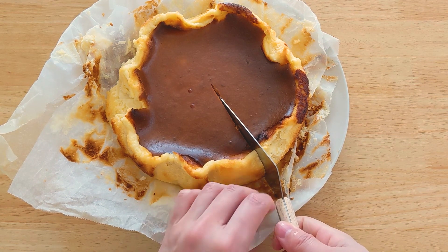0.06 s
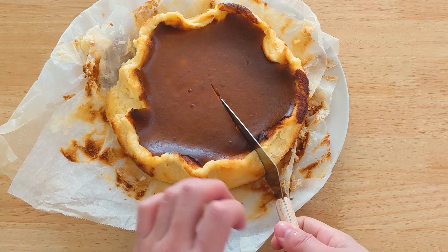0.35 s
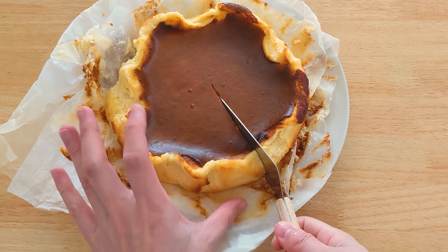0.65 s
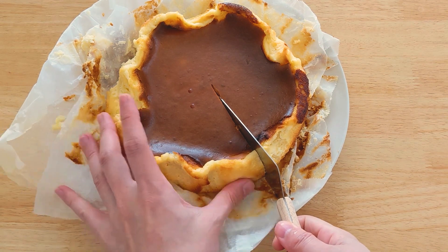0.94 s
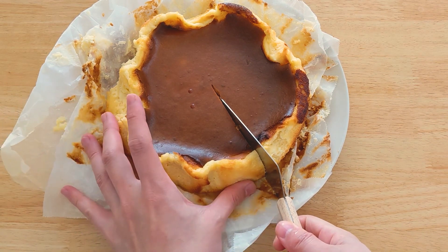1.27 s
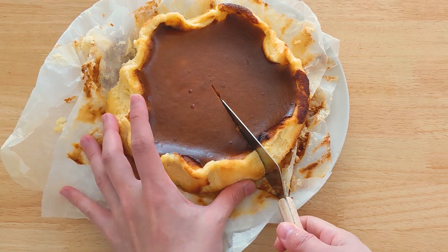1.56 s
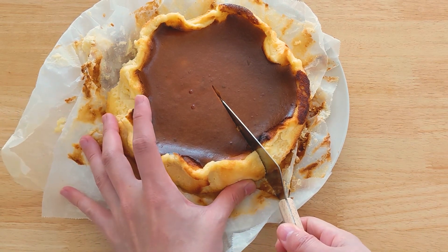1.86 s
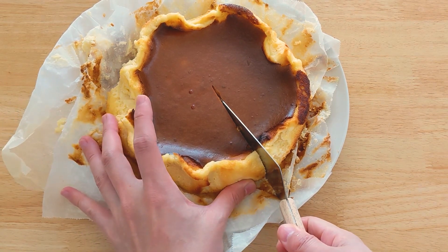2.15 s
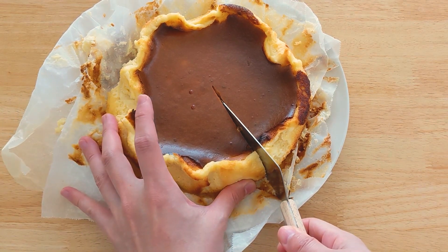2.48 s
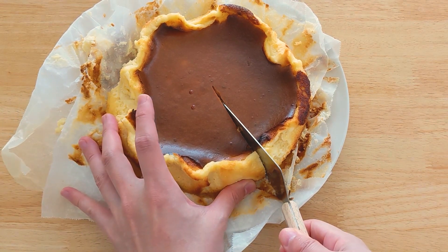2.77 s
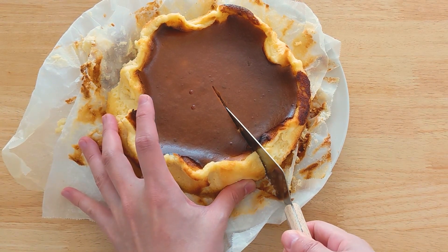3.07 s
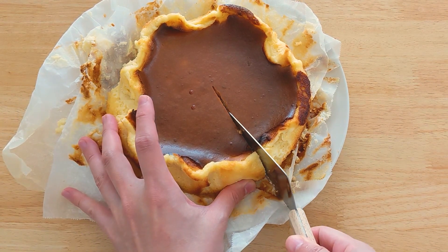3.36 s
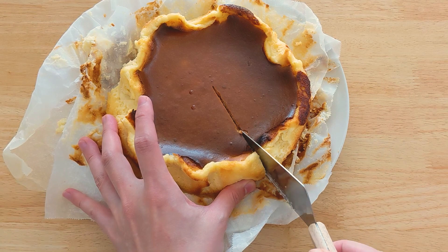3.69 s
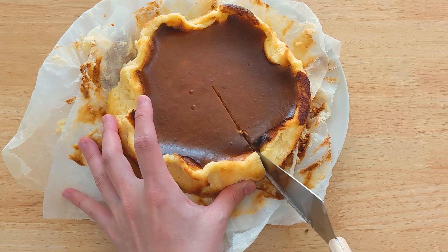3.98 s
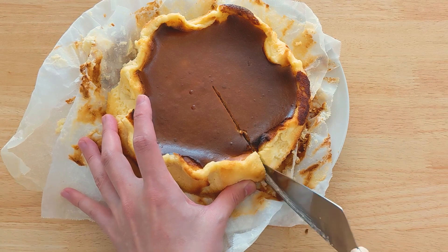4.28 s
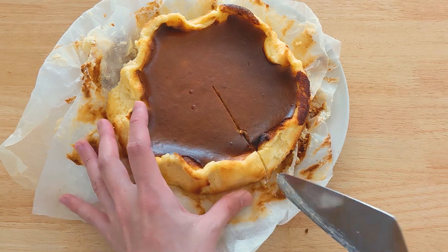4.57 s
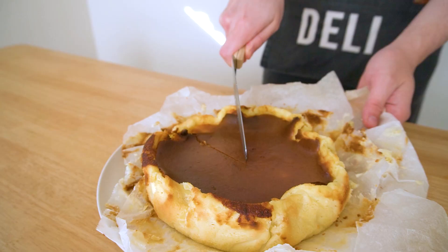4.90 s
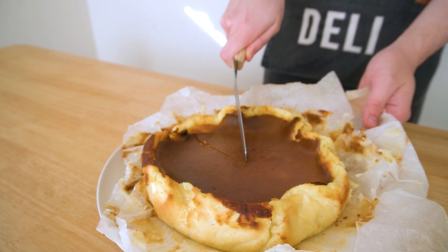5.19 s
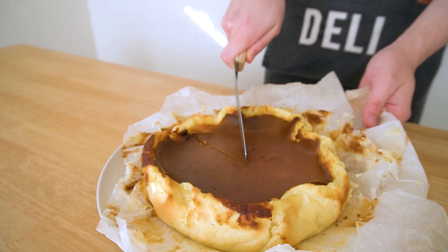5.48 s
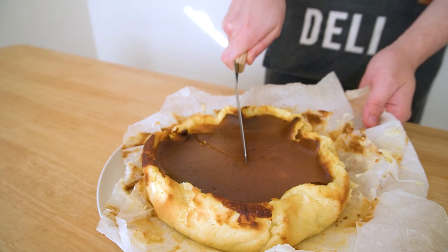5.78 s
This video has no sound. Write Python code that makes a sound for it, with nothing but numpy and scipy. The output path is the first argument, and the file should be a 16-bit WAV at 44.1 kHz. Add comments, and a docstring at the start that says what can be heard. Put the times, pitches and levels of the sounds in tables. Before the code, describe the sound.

A hand lightly brushes crumpled baking paper at the start, with one small crisp tick. From about 0.65 to 1.2 seconds it presses the paper down in five quick pushes, the loudest part: coarse, dry crinkling full of sharp snaps as creases buckle. The paper settles with a few fading ticks until about 1.9 seconds, followed by a lull. From around 3.2 to 4.2 seconds a knife draws through the cake's crust with a softer, fine rasp and several crumbling clicks, strongest near 3.6 seconds, with a very faint, thin ring from the blade just after. At 4.3 seconds the hand slides off the paper in a short, ticking rustle that peaks near 4.5 and fades by 5 seconds. Everything is close, with a short room echo, over a kitchen's faint, steady hum and air noise.

```python
"""A cake in crumpled baking paper on a plate, heard close up over a quiet kitchen's low hum.
A hand brushes the paper (0 s), then presses it flat in five pushes (0.65 s): it crinkles, creases
buckle and snap, and it slowly settles. A knife rasps out through the crust (3 s). The hand slides
off the paper (4.3 s). Rubbing is many tiny slips, each ringing a small damped facet of the surface.
The room adds a short tail."""
import sys
import numpy as np
from scipy import signal
from scipy.fft import rfft, irfft, next_fast_len
from scipy.io import wavfile
from scipy.ndimage import uniform_filter1d

SR = 44100
rng = np.random.default_rng(int(sys.argv[2]) if len(sys.argv) > 2 else 0)


def dump_mix(stems):
    """Bounce the given channels to the path in sys.argv[1] as a 16-bit WAV at rate SR."""
    frames = np.atleast_2d(stems).T  # one column per channel
    limited = np.clip(frames, -1, 1)  # hard clip at full scale
    pcm = np.round(limited * 32767).astype(np.int16)
    wavfile.write(sys.argv[1], SR, pcm)


N = 261947
TAPS = 2048
TIME = np.arange(N) / SR
HZ = np.fft.rfftfreq(TAPS, 1 / SR)


def gain_of(db):
    """Decibels to amplitude."""
    return 10 ** (np.asarray(db) / 20)


def unit_rms(x):
    """Scale to rms 1."""
    return x / np.sqrt(np.mean(x ** 2) + 1e-20)


def unit_energy(x):
    """Scale to energy 1."""
    return x / np.linalg.norm(x)


def read(points, hz):
    """Interpolate a table over log frequency."""
    f, value = np.transpose(points)
    return np.interp(np.log(hz + 1), np.log(f + 1), value)


def add(mix, start_s, sound):
    """Mix a sound in at start_s."""
    part = mix[max(0, round(start_s * SR)):][:len(sound)]
    part += sound[:len(part)]


def coloured(x, points):
    """Filter by a table of f/Hz, gain/dB."""
    size = next_fast_len(len(x) + TAPS)
    gain = gain_of(read(points, np.fft.rfftfreq(size, 1 / SR)))
    return irfft(rfft(x, size) * gain, size)[:len(x)]


def impulse(gain):
    """Minimum-phase click of this spectrum, unit energy."""
    log_gain = np.log(np.maximum(np.r_[gain, gain[-2:0:-1]], 1e-5))
    return unit_energy(np.fft.ifft(np.exp(np.conj(signal.hilbert(log_gain)))).real)


def drift(rate_hz):
    """Random curve through rate_hz knots a second, unit rms."""
    knots_s = np.arange(0, TIME[-1] + 2 / rate_hz, 1 / rate_hz)
    return unit_rms(np.interp(TIME, knots_s, rng.standard_normal(len(knots_s))))


def ventilation(level_db=-58.5, swell_db=0.5):
    """Low air noise and hiss, wider toward the treble."""
    # air spectrum: f/Hz, density/dB
    colour = [(20, -25), (48, -1.5), (70, -9), (110, -4), (160, -0.5), (260, 2), (380, -6), (650, -8.5),
              (900, -11), (1600, -13), (4500, -20), (7000, -26), (11000, -30.5), (16000, -35.5)]
    # stereo width: f/Hz, side re mid/dB
    width = [(30, -13), (60, -10.5), (290, -11.5), (640, -6.5), (1410, -4.5), (3100, -3), (6820, -1.5),
             (15000, 0)]
    mid, side = (unit_rms(coloured(rng.standard_normal(N), colour)) for _ in range(2))
    side = coloured(side, width)
    return np.array([mid + side, mid - side]) * gain_of(level_db + swell_db * drift(5.028))


def motor_hum(waver_db=1.3, waver_hz=2.47):
    """A motor's three lines, wavering in level and pitch."""
    # motor lines: f/Hz, rms level/dB
    lines = [(145.3, -75), (231.5, -73), (489.9, -71)]
    hum = np.zeros(N)
    for hz, db in lines:
        peak = np.sqrt(2) * gain_of(db + waver_db * drift(6.5))
        hum += peak * np.sin(2 * np.pi * np.cumsum(hz + waver_hz * drift(14)) / SR)
    return hum


def facet(ring_hz, q):
    """Power response of a small damped facet; its ring swells within a cycle."""
    detuning = (HZ + 1) / ring_hz - ring_hz / (HZ + 1)
    return 1 / (1 + (q * detuning) ** 2) ** 2


def stroke(curve, treble_follows, brighten_db_per_s, fade_s=0.02):
    """Body and treble gain of a stroke; the treble scales the swell in dB and ramps with time."""
    s, db = np.transpose(curve)
    body_db = np.interp(TIME, s, db)
    from_middle_s = np.clip(TIME, s[0], s[-1]) - (s[0] + s[-1]) / 2
    treble_db = db.max() + treble_follows * (body_db - db.max()) + brighten_db_per_s * from_middle_s
    contact = np.clip(1 + np.minimum(TIME - s[0], s[-1] - TIME) / fade_s, 0, 1)
    return contact * gain_of(body_db), contact * gain_of(treble_db)


def rustle(effort, colour, gain_db, treble_db, slips_per_s, spread_db, clump_db, hiss_share):
    """Rubbing sets off clumps of tiny slips, each ringing one facet; part of the treble is hiss."""
    body_gain, treble_gain = effort
    rubbing = body_gain > 1e-5
    powers = np.array([facet(hz, q=1.78) for hz in np.geomspace(1200, 13000, 12)])
    facets = np.sqrt(powers / powers.sum(0)) * gain_of(read(colour, HZ))  # powers sum to the colour
    size = gain_of(spread_db * np.minimum(rng.exponential(1, N), 4) + clump_db * drift(260))
    slips = size * rng.choice([-1, 1], N) * (rng.random(N) < slips_per_s / SR)
    facet_hit = rng.integers(0, len(facets), N)
    grains = np.zeros(rubbing.sum())
    for k, gain in enumerate(facets):
        hits = (slips * (facet_hit == k))[rubbing]
        grains += np.linalg.norm(gain) * signal.oaconvolve(hits, impulse(gain))[:len(grains)]
    # crossover: f/Hz, gain/dB
    low_pass = [(3500, 0), (5000, -4), (7000, -16), (10000, -35)]
    high_pass = [(2500, -50), (4000, -18), (5500, -5), (8000, 0)]
    body = unit_rms(coloured(grains, low_pass))
    crackle = unit_rms(coloured(grains, high_pass))
    hiss = unit_rms(coloured(coloured(rng.standard_normal(N)[rubbing], colour), high_pass))
    fizz = np.sqrt(1 - hiss_share) * crackle + np.sqrt(hiss_share) * hiss
    out = np.zeros(N)
    out[rubbing] = body * body_gain[rubbing] + fizz * treble_gain[rubbing] * gain_of(treble_db)
    return out * gain_of(gain_db)


def hand_shift():
    """The hand brushes lightly over the paper."""
    # stroke envelope: t/s, level/dB
    envelope = [(0, -61.5), (0.07, -53), (0.1, -48), (0.125, -39), (0.175, -54.6), (0.26, -54.9),
                (0.315, -54), (0.36, -67), (0.45, -67)]
    # brushing spectrum: f/Hz, density/dB
    colour = [(290, -42), (500, -13.5), (604, -22), (831, -16.5), (1210, -18), (1640, -1), (3150, -12.5),
              (4090, -10), (9490, -29.5), (10200, -26), (16000, -39)]
    effort = stroke(envelope, treble_follows=1.14, brighten_db_per_s=-6)
    return rustle(effort, colour, gain_db=-1.7, treble_db=-8,
                  slips_per_s=10000, spread_db=0, clump_db=1.9, hiss_share=0.56)


def scattered(click, decay_s):
    """Smear a click into a dying burst of the same broad colour, unit energy."""
    t = TIME[:TAPS]
    spectrum = rfft(rng.standard_normal(TAPS) * np.sqrt(t) * np.exp(-t / decay_s))
    white_burst = irfft(spectrum / uniform_filter1d(abs(spectrum), size=48))[:TAPS // 2]
    return unit_energy(signal.fftconvolve(click, white_burst)[:TAPS])


def snap(db, ring_hz, q, crack_db, crack_s=0.00064, flutter_db=-10, flutter_s=0.002):
    """A crease buckles: fibres crack, one facet rings, the sheet around it flutters."""
    # radiation of the sheet: f/Hz, gain/dB
    radiation = [(100, -21), (500, -24.5), (1050, -7.5), (1550, 2.5), (4500, 1), (9000, -6), (13500, -19),
                 (16000, -27)]
    sheet = gain_of(read(radiation, HZ))
    ring_gain = sheet * np.sqrt(facet(ring_hz, q))
    ring = np.linalg.norm(ring_gain) * impulse(ring_gain)
    crack = gain_of(crack_db) * np.linalg.norm(sheet) * scattered(impulse(sheet), crack_s)
    click = unit_energy(ring + crack)
    flutter = gain_of(flutter_db) * scattered(click, flutter_s)
    return gain_of(db) * np.sqrt(0.004 * SR) * unit_energy(click + flutter)  # db: rms over 4 ms


def loud_snaps(gain_db=-1.5):
    """Big creases of paper or crust give way one by one."""
    # buckling creases: t/s, level/dB, ring f/Hz, ring Q, relative crack level/dB
    creases = [(0.1289, -32, 1640, 3.3, -30), (0.316, -45, 1670, 4.7, -27), (0.653, -41.5, 1530, 1.3, -11),
               (0.6652, -31, 1970, 1.9, -5), (0.6976, -20, 1640, 2.5, -43), (0.7292, -32, 1820, 1.5, 3),
               (0.7568, -28, 1440, 0.97, -16), (0.7757, -28, 1430, 0.64, -2), (0.7883, -22, 1750, 2, -12.5),
               (0.876, -27.5, 2280, .7, -8), (0.9259, -35, 2090, 1, -12), (0.9891, -22, 2650, 2.8, -15.5),
               (1.0234, -29, 2090, 1.5, -10), (1.102, -22.5, 2400, 2.3, -12),
               (1.1178, -21.5, 2120, 1.9, -25), (1.1271, -16.5, 3100, .95, -16),
               (1.1446, -29.5, 1520, 1.1, -21), (1.1826, -28.5, 2910, 3.7, -13.5),
               (1.1898, -28.5, 2440, 0.87, -15), (1.2534, -23.5, 3990, 1.36, -10),
               (1.3449, -32.5, 2820, 1.06, -32), (1.3766, -27.5, 7500, 3.1, -5), (1.471, -46, 5340, 3, -3),
               (1.5071, -40, 8600, 1.8, -11.5), (1.5767, -38, 2150, 1.7, -37),
               (1.7592, -48, 2110, 1.5, -12), (1.8544, -51.5, 2200, 1.8, -6),
               (3.0527, -50.5, 2270, 1.1, -22), (3.2665, -37.5, 3280, 0.52, -35),
               (3.3587, -28, 3830, 1.3, -7), (3.475, -30.5, 1830, 1.5, -43), (3.503, -41, 1700, 1, -27),
               (3.6631, -27.5, 2290, 1.75, -16), (3.6693, -34, 2450, 0.88, -14),
               (3.7217, -37.5, 1580, 3, -31), (3.8641, -44, 1650, 1, -9), (4.0416, -44.5, 1960, 0.77, -17),
               (4.3092, -37, 1540, 2.7, -39), (4.4858, -27.5, 1770, 2.4, -32), (4.5105, -28, 1870, 3, -34),
               (4.6022, -37, 1950, 2.4, -16)]
    out = np.zeros(N)
    for s, db, ring_hz, q, crack_db in creases:
        add(out, s, snap(db + gain_db, ring_hz, q, crack_db))
    return out


def pushes(rise_s=0.024, release_s=0.033, settle_db=-17, settle_s=0.29):
    """Body and treble gain of pressing: each push rises, holds, lets go; the paper settles."""
    # hand pushes: start t/s, length/s, level/dB, treble offset/dB
    presses = [(0.652, 0.041, -31, -9.5), (0.73, 0.06, -33, -3), (0.825, 0.13, -38.5, -7),
               (0.959, 0.052, -32, -7), (1.077, 0.056, -30.5, -11.5)]
    body, treble = np.zeros(N), np.zeros(N)
    for start_s, length_s, db, treble_db in presses:
        rise = np.clip((TIME - start_s) / rise_s, 0, 1)
        after_s = np.maximum(TIME - start_s - length_s, 0)
        fall = np.maximum(np.exp(-after_s / release_s), gain_of(settle_db) * np.exp(-after_s / settle_s))
        push = gain_of(db) * rise ** 2 * fall
        body = np.hypot(body, push)
        treble = np.hypot(treble, push * gain_of(treble_db))
    return body, treble


def small_snaps(effort, per_s, over_db, ring_hz, octaves, q, crack_db):
    """Small creases give way at uneven intervals, louder with harder rubbing."""
    out, body = np.zeros(N), effort[0]
    start_s = TIME[np.argmax(body > 0)]
    for k, (lag, softer_db, pitch, crack) in enumerate(rng.uniform(-1, 1, (400, 4))):
        s = start_s + (k + 1 + lag) / per_s
        effort_db = 20 * np.log10(np.interp(s, TIME, body, right=0) + 1e-9)
        if effort_db > -70:
            hz = ring_hz * 2 ** (octaves * pitch)
            add(out, s, snap(effort_db + over_db - softer_db, hz, q, crack_db + 10 * crack))
    return out


def hand_press():
    """The hand crushes the paper against the plate: coarse crinkle, many small snaps."""
    # crinkle spectrum: f/Hz, density/dB
    colour = [(40,-33), (150,-12.5), (250,-16), (400,-14.5), (620,-17), (800,-9.5), (1100,-6.5),
              (1550,-1.5), (2050,1), (3500,-7.5), (4500,-7.5), (6000,-14.5), (9000,-22.5), (13500,-30),
              (16000,-41)]
    effort = pushes()
    crinkle = rustle(effort, colour, gain_db=-3, treble_db=-4.5,
                     slips_per_s=4500, spread_db=3, clump_db=3.5, hiss_share=0.16)
    snaps = small_snaps(effort, per_s=60, over_db=-2, ring_hz=2500, octaves=1, q=2.9, crack_db=-22)
    return crinkle + snaps


def knife_draw():
    """The blade drags through cake and crust: fine rasp, a few crumbling ticks."""
    # stroke envelope: t/s, level/dB
    envelope = [(3.0, -74), (3.24, -72), (3.31, -58), (3.42, -48.5), (3.58, -49.5), (3.635, -43.3),
                (3.79, -50), (3.92, -55.5), (4.0, -61), (4.28, -58.5)]
    # rasp spectrum: f/Hz, density/dB
    colour = [(40,-27), (90,-12), (160,-23), (500,-3.5), (750,-8), (1100,-6.5), (1550,4.5), (2250,7),
              (2900,4), (4200,-4.5), (5200,-7), (8500,-24), (16000,-35)]
    effort = stroke(envelope, treble_follows=0.6, brighten_db_per_s=4.5)
    rasp = rustle(effort, colour, gain_db=-2, treble_db=-16.5,
                  slips_per_s=5000, spread_db=2, clump_db=1.5, hiss_share=0.43)
    ring = blade_ring()
    ticks = small_snaps(effort, per_s=18, over_db=-0.5, ring_hz=2150, octaves=0.42, q=1.5, crack_db=-26)
    return rasp + ring + ticks


def blade_ring(middle_s=3.77, half_length_s=0.063, level_db=-58, flicker_db=2.1, ring_hz=5150, q=6.8):
    """The flat of the blade rubs the crust's hard rim and rings thinly."""
    response = impulse(np.sqrt(facet(ring_hz, q)))
    ring = unit_rms(signal.oaconvolve(rng.standard_normal(N), response)[:N])
    passing = np.exp(-((TIME - middle_s) / half_length_s) ** 2)
    return ring * gain_of(level_db + flicker_db * drift(120)) * passing


def hand_slide():
    """The hand slides off; the paper catches and slips with low ticks."""
    # stroke envelope: t/s, level/dB
    envelope = [(4.29, -57), (4.315, -40), (4.44, -43), (4.5, -32.5), (4.545, -41), (4.6, -37),
                (4.63, -44.5), (4.66, -40.5), (4.71, -58.5), (4.87, -66), (4.98, -77)]
    # sliding spectrum: f/Hz, density/dB
    colour = [(200,-43), (500,-30), (800,-22), (1080,-16.5), (1450,-2.5), (2150,-0.5), (2550,-6.5),
              (3300,-10), (4500,-13.5), (6500,-27.5), (10000,-36.5), (14000,-46), (16000,-48)]
    effort = stroke(envelope, treble_follows=0.64, brighten_db_per_s=17)
    rub = rustle(effort, colour, gain_db=-2, treble_db=-15,
                 slips_per_s=6000, spread_db=2.5, clump_db=1.5, hiss_share=0.47)
    ticks = small_snaps(effort, per_s=90, over_db=-3.5, ring_hz=1940, octaves=0.36, q=4, crack_db=-33)
    return rub + ticks


def room_response(early_db=-8.5, early_s=0.0072, tail_db=-8):
    """Quick scatter off plate, table and hands, then the kitchen's tail."""
    # room decay: f/Hz, T60/s
    t60 = [(300, 1), (2000, 0.39), (5000, 0.38), (9000, 0.32), (15000, 0.48)]
    # tail colour: f/Hz, gain/dB
    colour = [(300, 3), (1200, -1), (2500, -3.5), (4000, -2.5), (6000, 1.5), (9000, 2.5), (15000, -2)]
    t = TIME[:SR // 2]
    scatter = rng.standard_normal(len(t)) * (rng.random(len(t)) < 0.08) * (t > 0.001)
    early = unit_energy(scatter * np.exp(-t / early_s))
    reflections = rng.choice([-1., 1.], len(t)) * (rng.random(len(t)) < 0.1) * (t > 0.005)
    hz, frame_s, bands = signal.stft(reflections, SR, nperseg=256)
    decay = 1000 ** (-frame_s / read(t60, hz)[:, None])
    tail = unit_energy(signal.istft(bands * decay, SR, nperseg=256)[1][:len(t)])
    return gain_of(early_db) * early + gain_of(tail_db) * coloured(tail, colour)


def kitchen(x):
    """Direct sound in the centre; echoes widest in the treble."""
    # echo width: f/Hz, side re mid/dB
    width = [(300, -11.5), (1500, -29.5), (3000, -8), (6000, -4), (14000, 0.5)]
    mid = x + signal.oaconvolve(x, room_response())[:N]
    side = coloured(signal.oaconvolve(x, room_response())[:N], width)
    return np.array([mid + side, mid - side])


def scene():
    """Four movements and their snaps in the kitchen, over air noise and hum."""
    movements = hand_shift() + hand_press() + knife_draw() + hand_slide()
    return kitchen(movements + loud_snaps()) + ventilation() + motor_hum()


def record(dry):
    """Low-pass at 16.1 kHz."""
    low_pass = signal.firwin(511, 16100, window=("kaiser", 9), fs=SR)
    return signal.oaconvolve(dry, low_pass[None], "same")


dry = scene()
out = record(dry)
dump_mix(out)
```